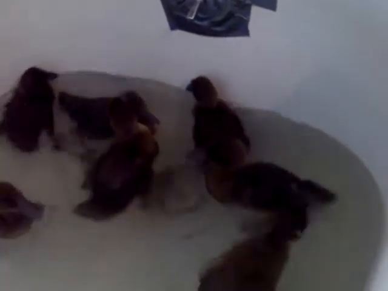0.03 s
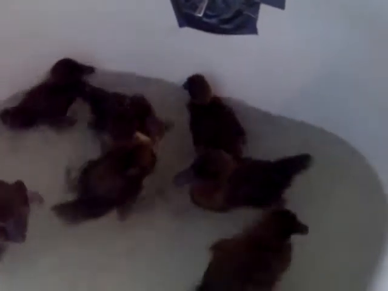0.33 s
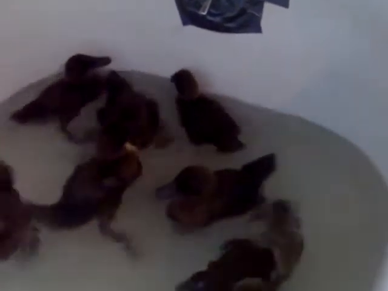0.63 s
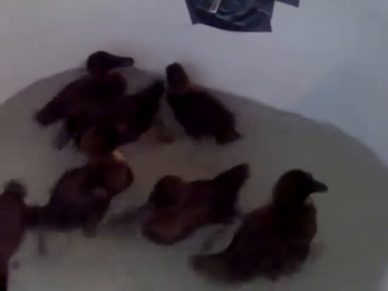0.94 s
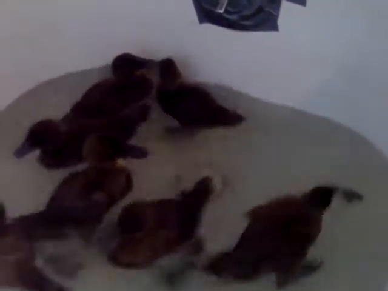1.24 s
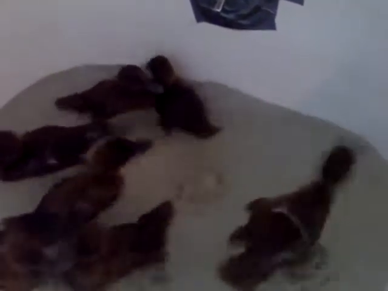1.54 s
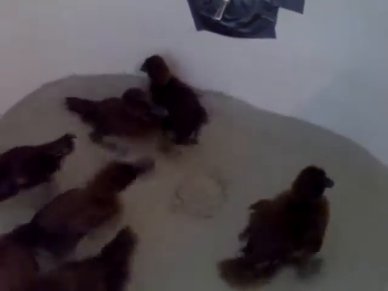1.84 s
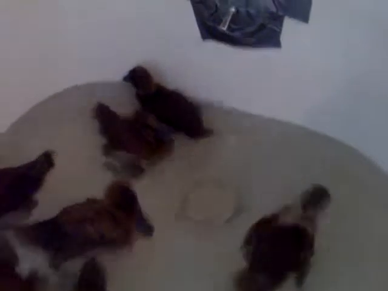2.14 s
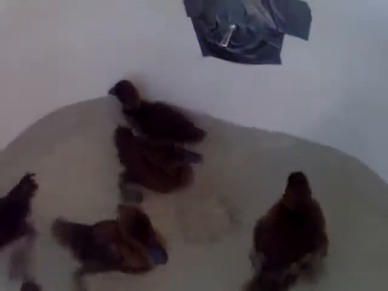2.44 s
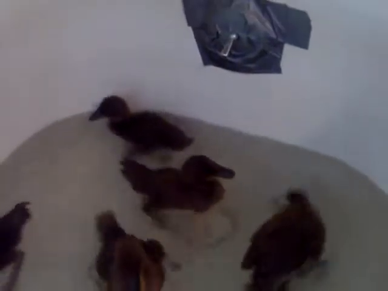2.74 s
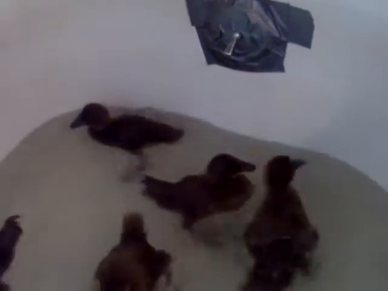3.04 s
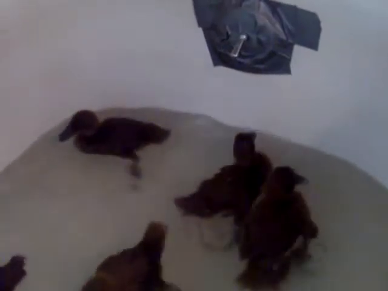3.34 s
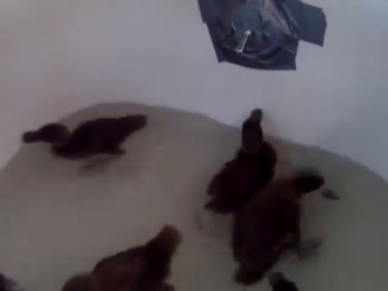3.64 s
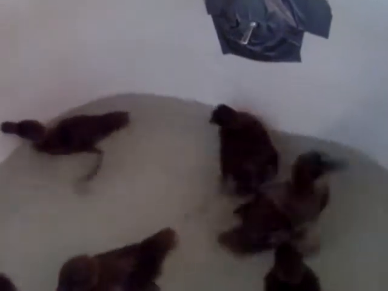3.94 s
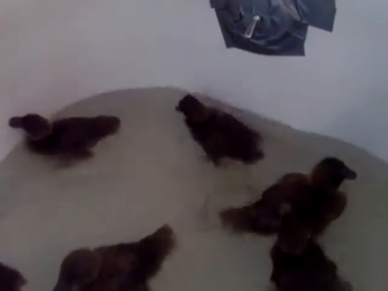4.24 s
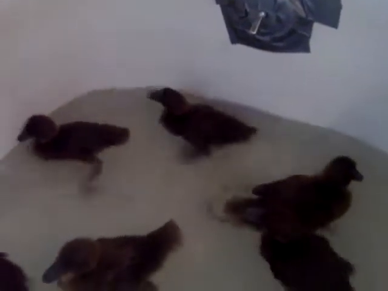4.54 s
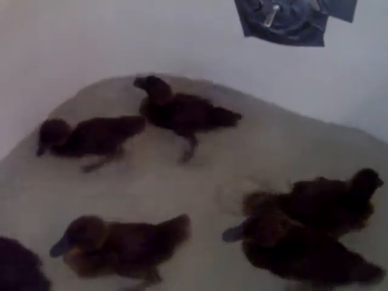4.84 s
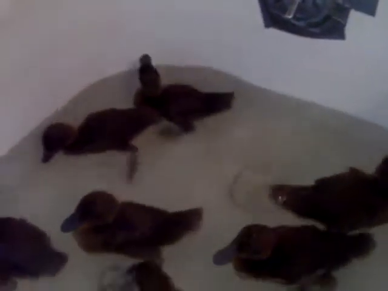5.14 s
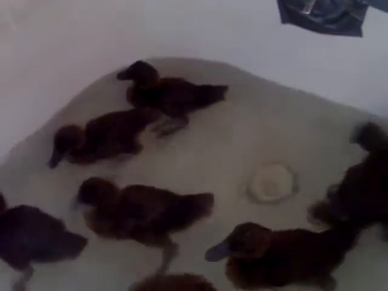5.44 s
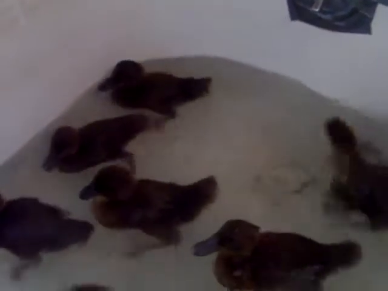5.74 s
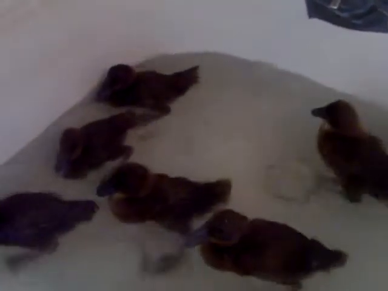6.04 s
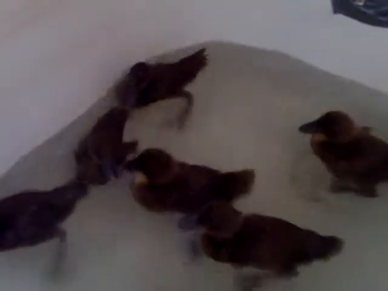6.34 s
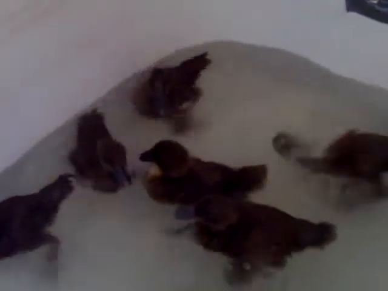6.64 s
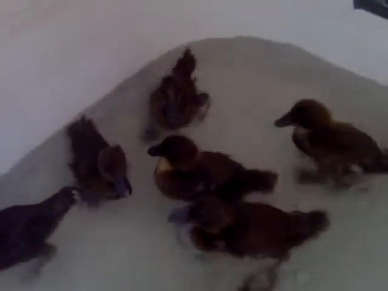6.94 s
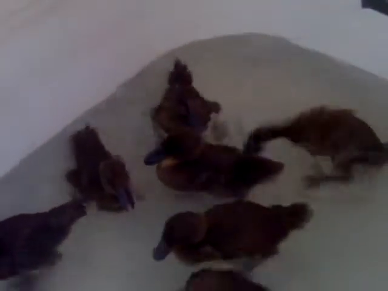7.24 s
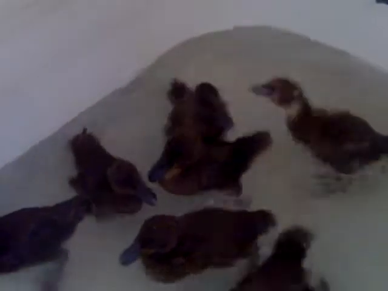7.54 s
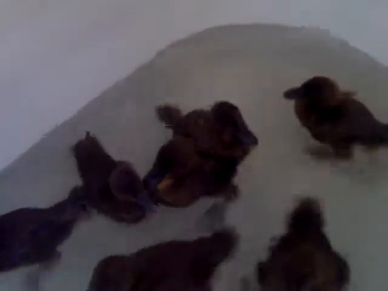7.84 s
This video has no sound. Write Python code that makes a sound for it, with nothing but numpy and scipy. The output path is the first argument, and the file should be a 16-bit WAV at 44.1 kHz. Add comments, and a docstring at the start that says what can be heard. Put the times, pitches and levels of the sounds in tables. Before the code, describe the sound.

Ducklings paddle in shallow bathtub water, heard from just above the rim. Light splashes come in uneven bouts, dotted with sharp drips, ringing little plops and quick gurgles. The water calms briefly, gets busier midway with a few low slops against the tub, and picks up again near the end, where a few soft, very short peeps appear. The tub adds a hollow ring over a faint, steady fan-like whir.

```python
"""Ducklings in a shallow bathtub

Heard from just above the rim, each drop ticks on the water and traps a bubble that rings briefly.
Bouts of paddling drive a patter of smaller bubbles, stray drops and crackle; dragged-under air gurgles.
The tub walls throw it all back. A few soft peeps and low slops, over a faint steady whir."""
import sys
import numpy as np
from scipy import signal
from scipy.fft import rfft, irfft, next_fast_len
from scipy.io import wavfile

SR = 44100
rng = np.random.default_rng(int(sys.argv[2]) if len(sys.argv) > 2 else 0)


def int16_out(signal):
    """Quantize to a 16-bit WAV file."""
    q = np.round(np.clip(np.atleast_2d(signal).T, -1, 1) * 32767)
    wavfile.write(sys.argv[1], SR, q.astype(np.int16))


N = 348375
TIME = np.arange(N) / SR


def drops(strays, slap_cycles=0.41, slap_db=3, splat_db=-3, splat_t60=0.017, cavity_db=-3, cavity_hz=620):
    """Each drop is a slap, a short splat of droplets and a ringing bubble, at its own spot in the tub."""
    # The drops and plops that stand out. Each row: start in seconds, bubble pitch in Hz,
    # bubble level in dB, ring time (t60) in ms, impact level in dB.
    featured_drops = [(0.058, 1292, -30, 76, -10), (0.187, 3530, -33, 16, -50),
                      (0.257, 3370, -21, 1.6, -18), (0.299, 2520, -35.5, 19, -23),
                      (0.3539, 934, -45, 66, -42), (0.444, 2430, -20, 2.4, -23),
                      (0.450, 2950, -21.5, 4.5, -13.5), (0.544, 2545, -30.5, 27, -40.5),
                      (0.569, 1370, -41, 50, -22), (0.577, 3630, -29, 6.2, -26),
                      (0.609, 2370, -34.5, 19, -41), (0.682, 8700, -34, 1.5, -15.5),
                      (0.967, 1590, -36, 28, -17.5), (0.979, 1216, -31.5, 24.5, -45),
                      (1.074, 3137, -29.5, 3.8, -26.5), (1.206, 1704, -29.5, 26, -45),
                      (1.211, 3193, -20, 4.9, -21), (1.432, 1590, -30, 14, -41),
                      (1.5655, 3860, -33, 8.4, -45), (1.606, 800, -36, 19, -33),
                      (1.642, 2840, -37.5, 3.6, -34), (1.737, 4050, -36, 8, -23.5),
                      (1.919, 3100, -41.5, 25, -29), (2.111, 2207, -30.5, 20, -36),
                      (2.1485, 6710, -39.5, 7.3, -20.5), (2.1875, 1422, -41, 46, -39),
                      (2.362, 1990, -33.5, 31, -26.5), (2.37, 9270, -19.5, 2.94, -43),
                      (2.554, 4580, -37.5, 3.3, -26.5), (2.598, 2910, -39.5, 20, -38.5),
                      (2.79, 6735, -44, 4.2, -28), (2.82, 5910, -29, 1.6, -33.5),
                      (2.926, 2930, -38, 8.3, -40), (2.942, 9920, -44, 3.4, -23.5),
                      (3.168, 6240, -41, 8.8, -27), (3.21, 6980, -45.5, 7.9, -19.5),
                      (3.254, 7600, -25, 2.5, -26), (3.385, 640, -18, 12.5, -24),
                      (3.447, 5870, -25.5, 3.5, -27), (3.669, 3273, -35, 18, -17.5),
                      (3.707, 1060, -44, 55, -43), (3.731, 2450, -39, 37, -34.5),
                      (3.809, 796, -32.5, 6.4, -28), (3.875, 5360, -27, 7, -18),
                      (3.933, 6340, -23, 1.27, -12.5), (3.956, 4800, -26, 4.1, -24),
                      (4.109, 4300, -30.5, 8, -22), (4.134, 461.5, -18, 11.3, -17),
                      (4.2, 3510, -28.5, 6.8, -29), (4.2845, 2696, -38.5, 17, -32),
                      (4.509, 4320, -37, 6, -46), (4.764, 1400, -28, 6.3, -29),
                      (4.776, 2470, -27, 3.2, -25), (4.877, 799, -31, 74, -31.5),
                      (4.988, 820, -31, 11.8, -29), (5.224, 5780, -34, 2.7, -39),
                      (5.316, 6560, -38, 7.7, -28), (5.419, 2900, -41, 13.3, -23.5),
                      (5.491, 10700, -34.5, 2.1, -38), (5.523, 1123, -32.5, 37, -24),
                      (5.543, 838, -30, 82, -15.5), (5.594, 2220, -31.5, 49, -23),
                      (5.626, 1060, -33, 22, -43), (5.677, 664, -24, 54, -45),
                      (5.789, 3210, -35.5, 4.9, -21.5), (5.802, 1888, -24.5, 5.3, -41),
                      (5.858, 5510, -42, 11.6, -23), (6.044, 2150, -39, 20, -31),
                      (6.0717, 9900, -35, 1.5, -13), (6.072, 4970, -32.5, 6.8, -17.5),
                      (6.074, 1045, -39, 71, -38.5), (6.252, 1550, -36.5, 13, -48),
                      (6.332, 3150, -40.5, 14.4, -27.5), (6.459, 3560, -36, 11, -40),
                      (6.466, 2320, -37, 24, -24.5), (6.524, 3870, -33, 7, -45),
                      (6.553, 10300, -31.5, 3.9, -33), (6.668, 989, -19, 2.7, -21.5),
                      (6.756, 1034, -27.5, 5.2, -27), (6.878, 2210, -35.5, 27, -43),
                      (6.956, 9220, -35, 2.3, -35), (7.008, 3700, -27.5, 1.8, -24),
                      (7.185, 4480, -33, 5.8, -30), (7.225, 7400, -47.5, 10, -9.5),
                      (7.3, 985, -26, 18, -18), (7.44, 2450, -30, 21, -31), (7.508, 11500, -32.5, 4, -46),
                      (7.5694, 5060, -29.5, 9, -13.5), (7.6173, 3410, -22.5, 7.8, -15),
                      (7.618, 2040, -24.5, 13, -29), (7.659, 1730, -18, 14, -12),
                      (7.718, 6700, -17, 1.4, -44), (7.798, 8560, -33.5, 4.8, -24),
                      (7.815, 4580, -21, 3.8, -26.5)]
    out, t = np.zeros(N), TIME[:1024]
    soften = signal.butter(1, 9000, fs=SR)
    for at, hz, bubble_db, ring_ms, impact_db in featured_drops + strays:
        # A big cavity pushes longer and splats low; a small one ticks and spits high.
        slap = signal.lfilter(*soften, fade(t, slap_cycles / hz))
        burst = rng.standard_normal(len(t)) * fade(t, splat_t60)
        splat = resonate(burst, 800 + 0.93 * hz, width=1600 + 0.12 * hz)
        splat /= np.linalg.norm(splat)
        sound = np.zeros(SR // 10)
        add(sound, 0, undb(impact_db) * (undb(slap_db) * slap + undb(splat_db) * splat))
        add(sound, 0, undb(bubble_db) * bubble(hz, ring_ms / 1000, rise=0.034, onset_cycles=0.57))
        # Only the deep plops clap shut, with a brief knock above their note.
        knock_gain = undb(bubble_db + cavity_db) / (1 + (hz / cavity_hz) ** 4)
        add(sound, 0, knock_gain * bubble(1.86 * hz, t60=0.0076, rise=0.035, onset_cycles=0.059))
        add(out, at, tub(highpass(sound, 0.89 * hz)))
    return out


def stray_drops(slosh, count, low_hz=1822, high_hz=10180, ring_cycles=33, follow=0.68, pivot_db=-55):
    """Rows of lesser drops for drops(): random, but thicker and stronger where the water is stirred."""
    rows, activity = [], np.cumsum(slosh ** .95)
    for k, (when, pitch, damping, trapped, struck) in enumerate(rng.random((count, 5))):
        i = min(np.searchsorted(activity, activity[-1] * (k + when) / count), N - 1)
        hz = low_hz * (high_hz / low_hz) ** pitch
        ring_ms = 1000 * ring_cycles * (.5 + damping) / hz  # small bubbles die sooner
        stir_db = pivot_db + follow * (20 * np.log10(slosh[i]) - pivot_db)
        bubble_db = stir_db + 14.5 + 3 * (2 * trapped - 1)
        impact_db = stir_db + 17 + 6 * (2 * struck - 1)
        rows.append((i / SR, hz, bubble_db, ring_ms, impact_db))
    return rows


def bubble(hz, t60, rise, onset_cycles):
    """Trapped air rings and dies; its pitch rises as it nears the surface."""
    t60 = max(t60, .001)
    t = np.arange(int(t60 * SR)) / SR
    cycles = hz * t * (1 + rise * t / t60 / 2)
    swell = (1 - np.exp(-cycles / onset_cycles)) * fade(t, t60)
    return np.sin(2 * np.pi * cycles) * swell / swell.max()


def stirring(attack_s=0.032, settle_t60=0.55, idle_slosh_db=-62.5, idle_spray_db=-64):
    """Slosh and spray envelopes: each bout stirs the water fast, holds and settles to idle lapping."""
    # Bouts of paddling. Each row: start in seconds, hold in seconds, slosh in dB, fine spray in dB.
    bouts = [(0.0, 0.038, -44.5, -48.5), (0.09, 0.26, -55.5, -50), (0.572, 0.23, -52, -49.5),
             (0.941, 0.07, -47.5, -53), (1.143, 0.063, -48, -51.5), (1.597, 0.077, -57, -58),
             (2.315, 0.044, -59.5, -58), (2.802, 0.076, -57.5, -55.5), (3.258, 0.14, -48.5, -48),
             (3.532, 0.073, -56.5, -47), (3.654, 0.18, -49.5, -51), (3.945, 0.16, -47, -47.5),
             (4.214, 0.073, -53, -53.5), (4.377, 0.016, -58.5, -49.5), (4.617, 0.026, -71.5, -54.5),
             (4.825, 0.15, -53.5, -62.5), (5.125, 0.04, -61.5, -56.5), (5.378, 0.07, -57.5, -57.5),
             (5.495, 0.2, -56, -55.5), (5.672, 0.12, -49.5, -53), (6.03, 0.13, -56, -56),
             (6.638, 0.11, -53, -60.5), (6.958, 0.089, -53.5, -55.5), (7.197, 0.15, -52.5, -46.5),
             (7.439, 0.25, -54, -51.5), (7.849, 0.054, -50, -52)]
    slosh_power = np.full(N, undb(idle_slosh_db) ** 2)
    spray_power = np.full(N, undb(idle_spray_db) ** 2)
    for at, hold, slosh_db, spray_db in bouts:
        start = max(at - attack_s, 0)
        t = TIME[:SR] + start - at
        shape = np.clip(1 + t / attack_s, 0, 1) * fade(np.maximum(t - hold, 0), settle_t60)
        add(slosh_power, start, (undb(slosh_db) * shape) ** 2)
        add(spray_power, start, (undb(spray_db) * shape) ** 2)
    return np.sqrt(slosh_power), np.sqrt(spray_power)


def paddling(slosh, spray, churn_db=-6, mist_db=-8.5, froth_db=-5):
    """Feet churn the water into bubbles and throw a fine spray; countless tiny bursts merge into froth."""
    # Tone of the small bubbles. Each row: frequency in Hz, gain in dB.
    churn_eq = [(300, 4), (500, -15.5), (800, 0), (1400, 3.5), (2500, 2), (4000, -1.5), (6000, -12),
                (10000, -54), (15000, -34)]
    # Tone of the spray. Each row: frequency in Hz, gain in dB.
    mist_eq = [(1000, -6.5), (3000, -8.5), (6000, -11), (9800, -8.5), (12500, -15.5), (15500, -3)]
    froth = undb(froth_db) * rng.standard_normal(N)
    small_bubbles = patter(412, 7730, ring_cycles=33.5, spread_db=12, count=1900)
    tiny_bubbles = patter(2950, 13370, ring_cycles=24, spread_db=15, count=1000)
    churn = unit(colour(small_bubbles + froth, churn_eq))
    mist = unit(colour(tiny_bubbles + froth[::-1], mist_eq))
    return churn * slosh * undb(churn_db) + mist * spray * undb(mist_db)


def patter(low_hz, high_hz, ring_cycles, spread_db, count):
    """Small bubbles at random moments: many faint ones, a few clearer ones."""
    out = np.zeros(N)
    for when, pitch, strength, damping in rng.random((count, 4)):
        hz = low_hz * (high_hz / low_hz) ** pitch
        db = spread_db * min(-np.log(1 - strength), 2)
        ring = bubble(hz, ring_cycles * (.5 + damping) / hz, rise=0.39, onset_cycles=0.26)
        add(out, when * N / SR, undb(db) * hz * ring)
    return unit(out)


def crackle(spray, count, crackle_db=-8, spread_db=9, low_hz=4500):
    """The finest droplets trap no air: bare ticks whose level follows the spray."""
    ticks = np.zeros(N)
    for when, strength in rng.random((count, 2)):
        ticks[int(when * N)] += undb(spread_db * min(-np.log(1 - strength), 2))
    return unit(highpass(ticks, low_hz)) * spray * undb(crackle_db)


def gurgles(gap_s=.009, spread_octaves=0.53, ring_cycles=11.7, scatter_db=1.5):
    """Air dragged under by a foot or bill breaks into a quick, uneven run of bubbles of like size."""
    # Each row: start in seconds, length in seconds, middle pitch in Hz, bubble level in dB.
    air_pockets = [(0.0, 0.03, 1700, -37.5), (0.452, 0.04, 2800, -33.5), (1.135, 0.06, 1003, -43.5),
                   (3.67, 0.11, 1690, -40), (3.96, 0.07, 2400, -41.5), (4.763, 0.03, 2100, -31),
                   (6.659, 0.12, 1300, -37), (7.163, 0.04, 3710, -35)]
    out = np.zeros(N)
    for at, length, middle_hz, db in air_pockets:
        run = np.zeros(SR // 4)
        for k, (late, pitch, strength) in enumerate(rng.uniform(-1, 1, (20, 3))):
            start = gap_s * (k + .5 + late / 2)
            if start < length:
                hz = middle_hz * 2 ** (spread_octaves * pitch)
                ring = bubble(hz, ring_cycles / hz, rise=0.16, onset_cycles=0.58)
                add(run, start, undb(db + scatter_db * strength) * ring)
        add(out, at, tub(run))
    return out


def peeps(waver=0.0052):
    """The ducklings' soft peeps: short, slightly wavering whistles that glide in pitch."""
    # Each row: start in seconds, length in seconds, first, middle and last pitch in Hz, level in dB.
    calls = [(0.424, 0.021, 4740, 2970, 2100, -40.5), (4.071, 0.026, 1192, 1390, 1910, -59),
             (6.103, 0.044, 1514, 2466, 2690, -44), (6.591, 0.033, 1050, 1420, 1580, -45),
             (7.27, 0.029, 2680, 2400, 1900, -47), (7.583, 0.048, 2020, 2400, 2200, -48.5),
             (7.865, 0.028, 1910, 2460, 2410, -39.5)]
    out = np.zeros(N)
    for at, length, first_hz, middle_hz, last_hz, db in calls:
        progress = np.linspace(0, 1, int(length * SR))
        glide = np.polyfit([0, .5, 1], [first_hz, middle_hz, last_hz], 2)
        hz = np.polyval(glide, progress) * (1 + waver * wander(355)[:len(progress)])
        flutter = undb(1.3 * wander(240)[:len(progress)])
        swell = np.sqrt(4 * progress * (1 - progress)) * flutter
        add(out, at, undb(db) * swell * np.sin(2 * np.pi * np.cumsum(hz) / SR))
    return out


def slops(push_t60=0.97):
    """A wave pushes on the tub wall and the shell rumbles briefly."""
    # Each row: start in seconds, peak level in dB.
    waves = [(3.516, -46), (4.014, -50), (5.055, -50.5)]
    # Resonances of the tub shell. Each row: frequency in Hz, bandwidth in Hz, relative level in dB.
    shell_modes = [(171, 15, -27), (211, 6.4, 0), (251, 8.9, -6), (320, 190, 0)]
    out, t = np.zeros(N), TIME[:SR // 2]
    for at, db in waves:
        push = rng.standard_normal(len(t)) * fade(t, push_t60)
        shell = sum(undb(mode_db) * resonate(push, hz, width) for hz, width, mode_db in shell_modes)
        rumble = highpass(shell, 130)
        add(out, at, undb(db) * rumble / np.abs(rumble).max())
    return out


def tub(x, tail_db=-3, split_hz=4000, low_t60=.3, high_t60=.21, build_s=0.0024, path_spread=.2):
    """One spot in the tub: direct sound, its own near wall echoes, then a dense bright tail."""
    # Echoes off the near walls. Each row: typical delay in ms, level in dB.
    wall_echoes = [(.8, -10.5), (2.2, -11), (3.5, -8), (5.8, -50), (9.5, -16.5), (13.8, -12.5)]
    t = TIME[:SR // 4]
    noise = rng.standard_normal(len(t)) * (1 - np.exp(-t / build_s))
    low = signal.lfilter(*signal.butter(1, split_hz, fs=SR), noise)
    tail = low * fade(t, low_t60) + (noise - low) * fade(t, high_t60)
    response = undb(tail_db) * tail / np.linalg.norm(tail)
    response[0] += 1  # direct sound
    for ms, db in wall_echoes:
        delay = ms / 1000 * np.exp(path_spread * rng.uniform(-1, 1))
        response[int(delay * SR)] += undb(db)
    return signal.fftconvolve(x, response)


def hollow(x, send_db=-4):
    """The air between the tub walls rings along with the splashing."""
    # Each row: frequency in Hz, bandwidth in Hz, relative level in dB.
    air_modes = [(392, 14, 6), (576, 18, 4), (608, 18, 3), (775, 18, 3), (981, 26, 1), (1277, 35, 1),
                 (1706, 25, 2)]
    return sum(undb(db + send_db) * resonate(x, hz, width) for hz, width, db in air_modes)


def room(hiss_db=-59, wander_hz=9, wander_db=4):
    """Steady hiss with a few wavering tones, as of a far fan."""
    # Tone of the hiss. Each row: frequency in Hz, gain in dB.
    hiss_eq = [(25, -13.5), (48, -32), (60, -13.5), (90, -22.5), (150, -23.5), (210, -13.5), (310, -7),
               (450, -3.5), (780, 2.5), (1500, -5), (3000, -18), (6000, -41), (10000, -27.5), (15000, -26)]
    # The whir. Each row: pitch in Hz, level in dB.
    whir_tones = [(470, -68), (780, -71), (1040, -72)]
    out = unit(colour(rng.standard_normal(N), hiss_eq)) * undb(hiss_db)
    for hz, db in whir_tones:
        phase = 2 * np.pi * np.cumsum(hz + wander_hz * wander(45)) / SR
        out += undb(db + wander_db * wander(25)) * unit(np.sin(phase))
    return out


def undb(db):
    """Decibels to gain."""
    return 10 ** (np.asarray(db) / 20)


def unit(x):
    """Scale to rms 1."""
    return x / np.sqrt(np.mean(x ** 2))


def fade(t, t60):
    """Exponential decay, 60 dB down at t60 seconds."""
    return np.exp(-np.log(1000) * t / max(t60, 1e-4))


def add(out, at, sound):
    """Mix a sound in at a time in seconds."""
    i = int(np.clip(at * SR, 0, len(out)))
    out[i:i + len(sound)] += sound[:len(out) - i]


def colour(x, points):
    """Equalise along a curve of (Hz, dB) points."""
    hz, db = np.transpose(points)
    size = next_fast_len(len(x), real=True)
    f = np.maximum(np.fft.rfftfreq(size, 1 / SR), 1)
    gain = undb(np.interp(np.log(f), np.log(hz), db))
    return irfft(rfft(x, size) * gain, size)[:len(x)]


def resonate(x, hz, width):
    """Two-pole resonance, gain 1 at its centre."""
    return signal.lfilter(*signal.iirpeak(hz, hz / width, fs=SR), x)


def highpass(x, hz):
    """Low cut, 12 dB an octave."""
    return signal.lfilter(*signal.butter(2, min(hz, SR / 3), "highpass", fs=SR), x)


def wander(rate_hz):
    """Gliding random modulation with a spread near 1."""
    knots = rng.standard_normal(int(N / SR * rate_hz) + 2)
    return np.interp(TIME * rate_hz, np.arange(len(knots)), knots)


def scene():
    """Ducklings paddling at two spots in the ringing tub, with the room around it."""
    slosh, spray = stirring()
    bath = sum(tub(paddling(slosh, spray))[:N] for _ in range(2))
    bath += tub(peeps() + crackle(spray, count=320))[:N]
    bath += gurgles()
    bath += drops(stray_drops(slosh, count=56))
    bath = highpass(highpass(bath, 490), 160)  # small splashes radiate no bass
    return (bath + hollow(bath) + slops() + room())[None]


def record(dry, notch_hz=7870, notch_width_hz=420, top_hz=15600):
    """A small microphone with one narrow notch and a soft top."""
    x = dry[0] - resonate(dry[0], notch_hz, notch_width_hz)
    x = colour(x, [(20, -5.5), (6000, 2), (10000, 4.5), (12500, 2.5), (15500, -12.5)])
    high_cut = signal.ellip(8, .2, 70, top_hz, fs=SR, output="sos")
    return signal.sosfilt(high_cut, x)[None]


dry = scene()
out = record(dry)
int16_out(out)
```